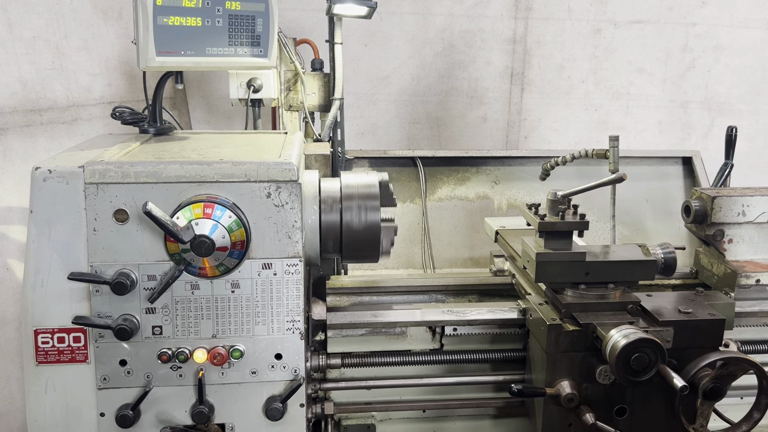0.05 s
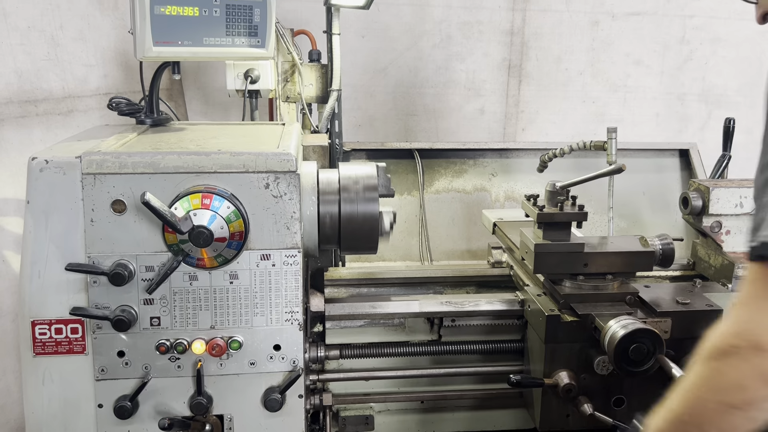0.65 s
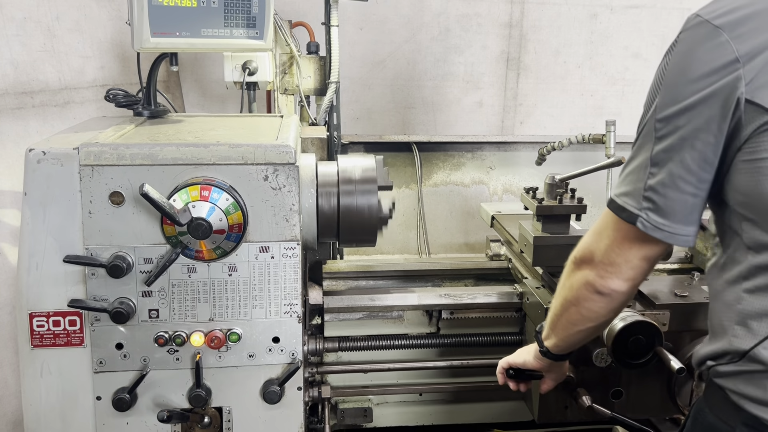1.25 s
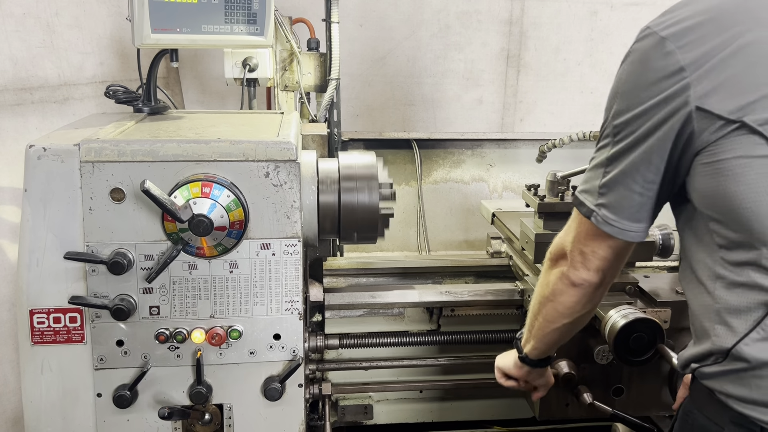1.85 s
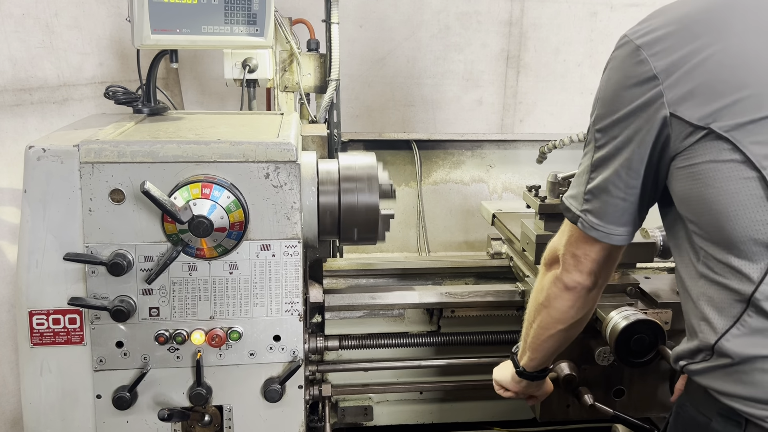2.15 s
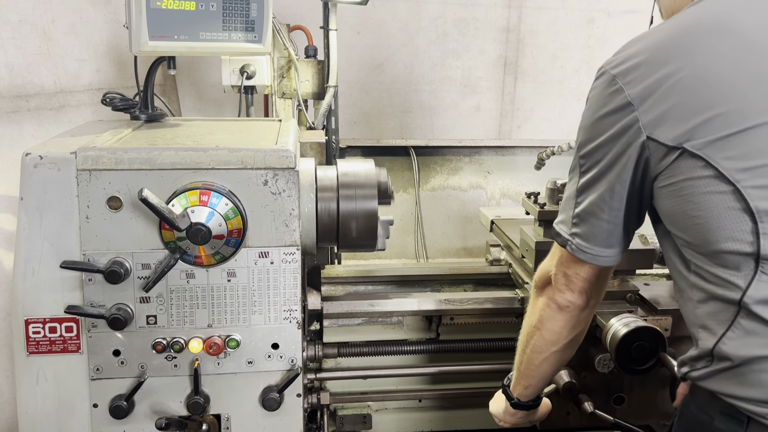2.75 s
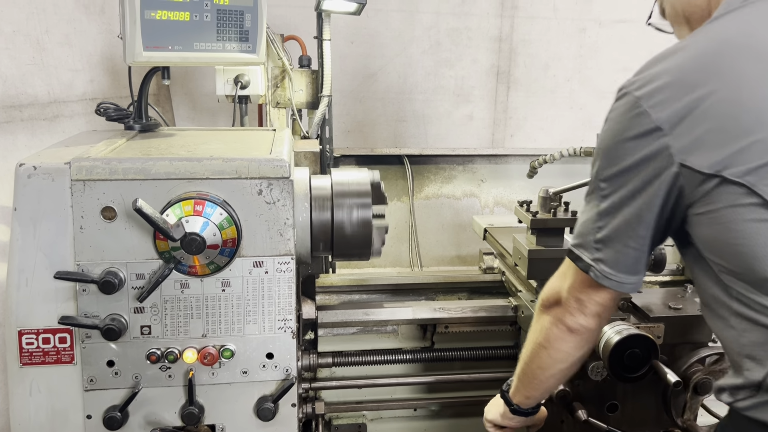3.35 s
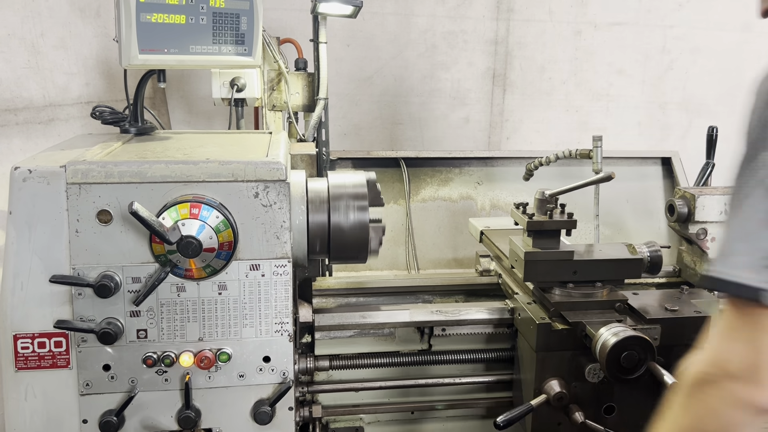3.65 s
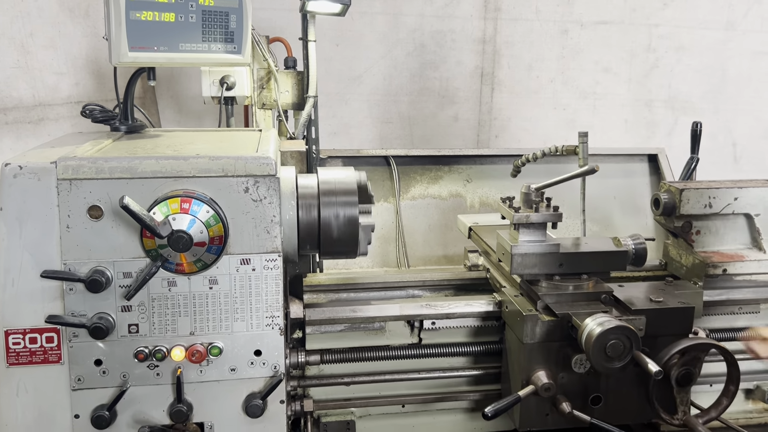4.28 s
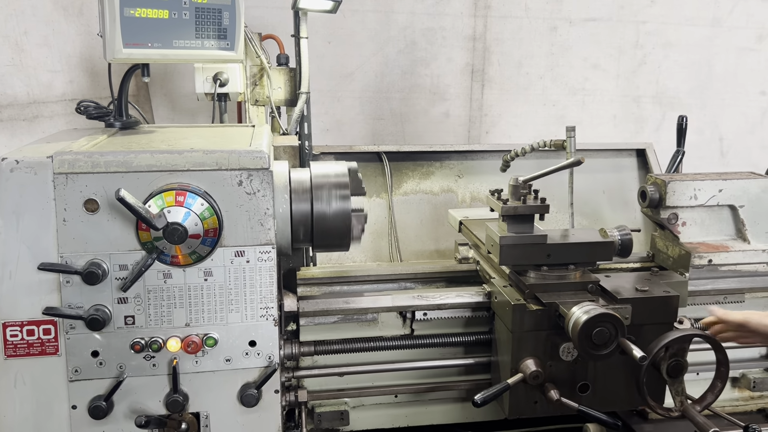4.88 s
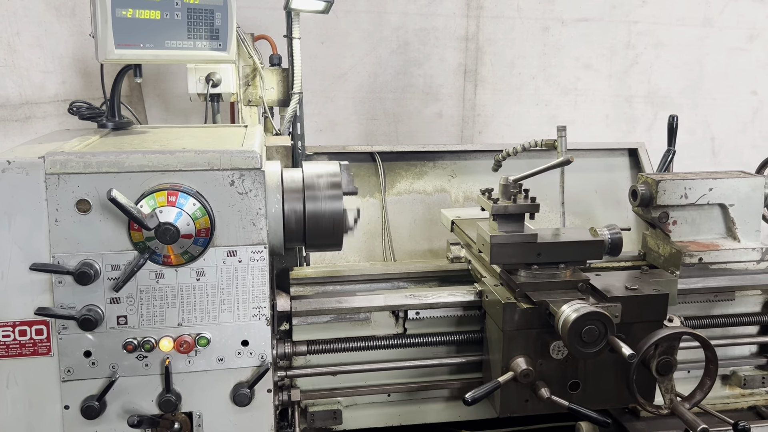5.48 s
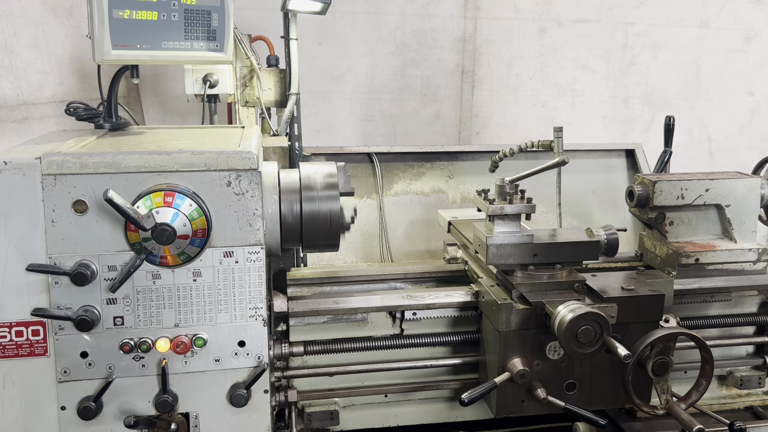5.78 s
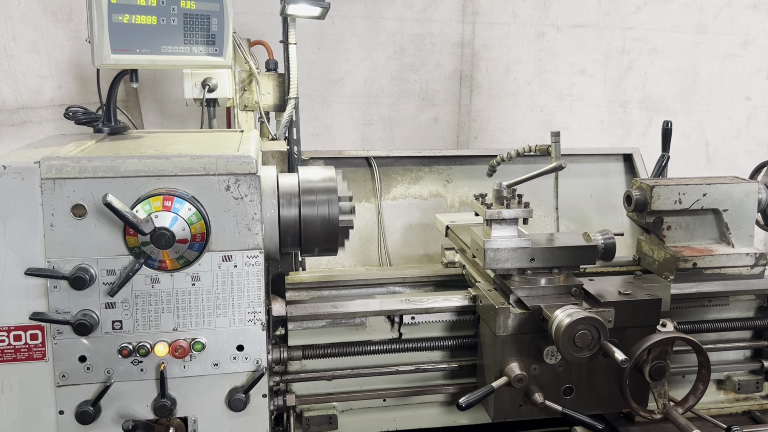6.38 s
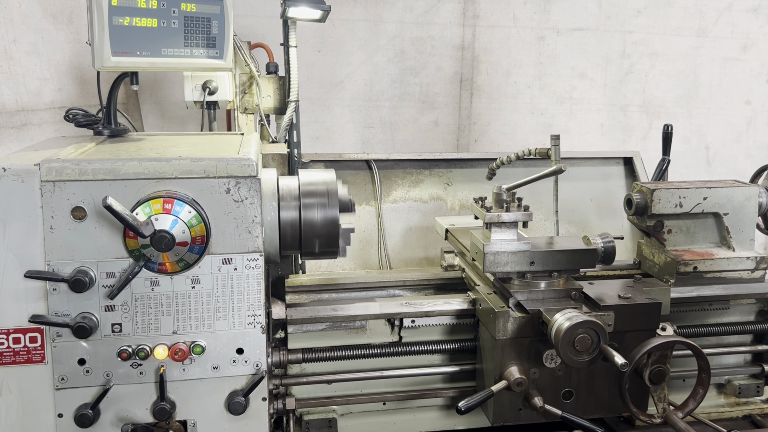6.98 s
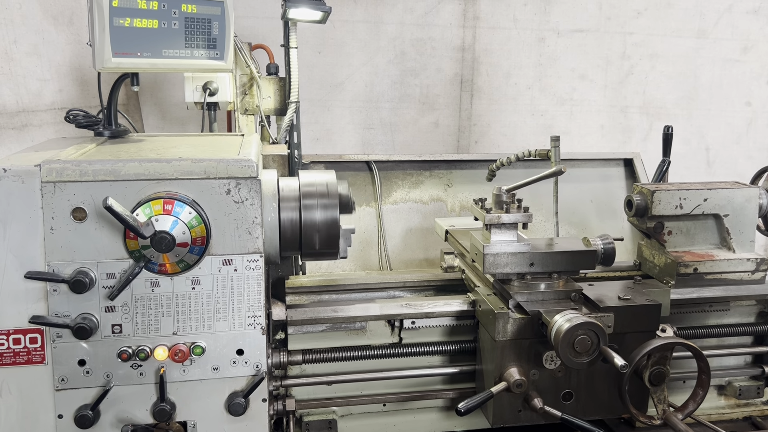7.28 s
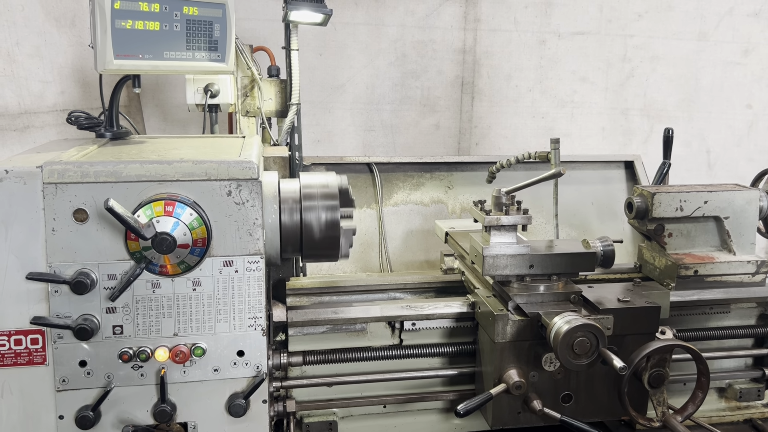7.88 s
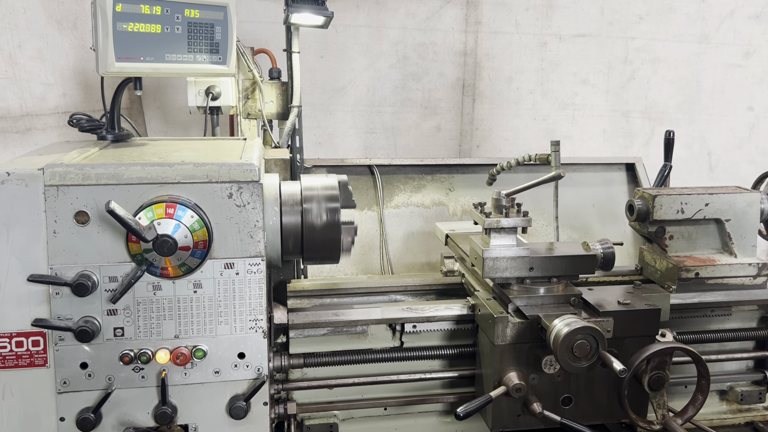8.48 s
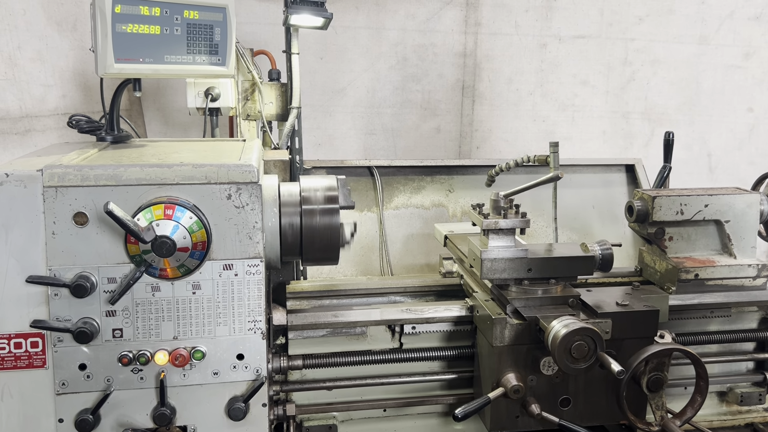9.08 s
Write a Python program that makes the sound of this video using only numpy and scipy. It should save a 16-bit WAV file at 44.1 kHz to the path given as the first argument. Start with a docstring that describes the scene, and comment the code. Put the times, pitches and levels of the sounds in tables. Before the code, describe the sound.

Heard close up in stereo, a geared lathe drones steadily in a workshop, with layered gear whine, a fluttering hum and a high whistle above a churning rumble. A faint metallic tick comes from a lever near the start. Midway, one loud clank with a low thud marks the clutch engaging and leaves a short steel ring. The gears then whine on at the same speed, the whistle now quieter.

```python
"""A workshop, the stereo microphone a step away from a geared centre lathe running at constant speed.
Motor and headstock gears whine in many lines over the rumble of bearings and churning oil, with a
wavering hum and the whistle of the fastest mesh. Early on, the apron lever gives one small tick.
Midway the feed clutch drops in with a steel clank and a thud of the apron that ring out in the room;
the gears then carry the carriage along."""
import sys
import numpy as np
from scipy import signal
from scipy.fft import rfft, irfft, next_fast_len
from scipy.io import wavfile

SR = 44100
rng = np.random.default_rng(int(sys.argv[2]) if len(sys.argv) > 2 else 0)


def to_wav(s):
    """Save 16-bit WAV."""
    ch = np.atleast_2d(s).T  # columns
    pcm = np.round(np.clip(ch, -1, 1) * 32767)  # PCM
    wavfile.write(sys.argv[1], SR, pcm.astype(np.int16))


N = 402633

SHAFT_HZ = (18.85, 28.9)   # turns a second of the two fast shafts
# The clutch dogs meeting. Each row: start in seconds, strength in dB.
DOG_CONTACTS = [(4.5412, -23), (4.5638, -7), (4.5650, 2.5), (4.5692, -15), (4.5760, -14.5), (4.5810, -8)]
# Slow swell of the gear growl in the low middle. Each row: time in seconds, gain in dB.
GROWL_SWELL = [(0, -1), (.8, -1), (1.15, -0.3), (1.4, -0.5), (1.7, 0), (3.5, 0), (3.9, -0.9), (4.8, 0.2),
               (5.3, 0.5), (6.7, 0.2), (7.1, -.5), (8.25, -1), (8.38, 1), (8.52, 0), (9.1, 0.6)]
GROWL_HZ, GROWL_WIDTH_HZ = 620, 400
# How alike left and right sound. Each row: frequency in Hz, likeness from -1 (opposed) to 1 (the same).
STEREO_LIKENESS = [(450, 1), (550, 0.64), (1100, 0.5), (1700, 0.06), (3800, 0.2), (5600, 0.2), (7300, 0.5),
                   (8500, 0.9), (9230, -1), (11100, -1), (11450, 1), (12800, 1), (13000, 0.5)]


def gear_whine(speed_wander=0.00025, jitter_rad=0.17, waver_db=1.24, runout=0.03, gain_db=0.41):
    """All lines follow one motor speed; tooth errors make each flutter, untrue shafts throb on them."""
    # Motor and gear lines. Each row: frequency in Hz, level running free in dB, level with the feed
    # engaged in dB, left over right in dB, lead of the left side in radians.
    gear_lines = [(68, -60, -57, 2, 0), (74.7, -53, -52, 1, -0.1), (97.6, -59, -52, 1, 0),
                  (102, -58, -53, 1, 0), (107.7, -54, -52, 2, 0), (124.5, -57, -55, 2, 0),
                  (173.9, -49, -50, -1, 0.1), (250.3, -52, -53, 1, 0.2), (300.1, -53, -56, 1, -0.4),
                  (325, -49, -48, 0, 0), (349.9, -49, -48, -1, -0.2), (361.7, -55, -51, 1, 0.0),
                  (422.6, -47, -48, 1, -0.2), (457.6, -55, -56, 2, 0), (511.8, -41.5, -41.5, -1, 0.3),
                  (517.1, -48, -47, -1, 0.2), (580.1, -58, -57, -1, -0.6), (587.5, -47, -47.5, -7, -0.1),
                  (620.8, -53, -50, -2, 0.1), (665, -52, -51, 1, -0.1), (685, -52, -51, 2, 0.9),
                  (694.1, -38, -37, -4, 0.5), (700.5, -45, -45, -4, 0.7), (723, -35.3, -37.6, 5, 0.0),
                  (747.6, -51, -52, -3, -0.1), (752, -44, -45.5, -8, 0.1), (761.1, -57, -55, 0, 0.1),
                  (771.8, -54, -54, -2, 0.1), (896.7, -50, -48, 1, 0.1), (925.6, -52, -47, -2, 0.5),
                  (931.3, -57, -48, 1, -0.1), (940.1, -56, -51, -3, -0.5), (992.9, -53, -56, -5, 0.5),
                  (1037.6, -55, -63, 2, -0.1), (1115.4, -54, -55, -6, -1.5), (1137.6, -51, -50, -2, -0.5),
                  (1156.1, -56, -54, 0, 1.3), (1174.9, -38.7, -39, 1, -0.2), (1193.7, -46.5, -50, -5, 0.4),
                  (1203.8, -55, -56, 3, -0.6), (1212.6, -53, -53, -4, 0.0), (1260.4, -54, -61, 1, 0.4),
                  (1324.3, -55, -56, 3, 1.4), (1367.4, -54, -56, -1, 0.9), (1417.2, -57, -55, 0, 0.8),
                  (1451.5, -46.5, -48.5, 4, -0.8), (1456.2, -55, -59, 5, -0.2), (1463.2, -49, -51, 3, 0.7),
                  (1509.3, -54.5, -53.5, -1, -0.3), (1596.5, -50, -50, -2, 3.0),
                  (1636.5, -53, -55, -3, 0.8), (1665.5, -60, -59, 0, 1.1), (1694.4, -57, -62, 3, -0.4),
                  (1729.4, -46, -50, 2, 0.4), (1742.8, -56, -65, 0, 1.0), (1762.7, -50, -44, -4, 0.3),
                  (1781.2, -58, -55.5, -3, 0.6), (1791.3, -60, -57, -4, -0.4), (1821.6, -49, -48, -1, 1.2),
                  (1862.3, -51, -57, -5, 1.6), (1880.1, -63, -55, -1, 0.3), (1995.9, -60, -58, 7, 1.4),
                  (2313.1, -55, -55, 2, 1.9), (2570.5, -58, -65, -4, 3.0), (2628.1, -59, -65, 7, 1.1),
                  (2937.3, -61, -59, -1, 2.1), (3060.7, -67, -61, 9, 1.0), (3523.7, -58, -66, 9, 0.7),
                  (3857.8, -69, -69, 2, 1.3), (4112.8, -69, -67, 10, -0.7), (4698.6, -72, -72, 3, -0.8)]
    # Slow swell of the singing upper meshes. Each row: time in seconds, gain in dB.
    singing_swell = [(0, -1.5), (1.2, 1.5), (2.3, 1.5), (3.3, 1.3), (4.4, -0.2), (4.7, -3), (5.3, 0.4),
                     (9.1, -0.5)]
    t = np.arange(N) / SR
    motor_time = t + speed_wander * np.cumsum(drift(1.38)) / SR
    engaged = np.clip((t - DOG_CONTACTS[0][0]) / 0.22 + .5, 0, 1)   # the load comes on over 0.22 s
    slow_throb, fast_throb = [1 + runout * np.sin(2 * np.pi * hz * motor_time) for hz in SHAFT_HZ]
    wavers = [from_db(gain_db + waver_db * drift(5)) for _ in range(7)]
    jitters = [jitter_rad * drift(14) for _ in range(11)]
    growl = from_db(in_time(GROWL_SWELL)) - 1
    singing = from_db(in_time(singing_swell)) - 1
    out = np.zeros((2, N))
    for k, (hz, free_db, fed_db, balance_db, lead) in enumerate(gear_lines):
        phase = 2 * np.pi * ((hz * motor_time + rng.random()) % 1) + jitters[k % len(jitters)]
        load = from_db(free_db) * (1 - engaged) + from_db(fed_db) * engaged
        swell = 1 + growl * within(hz, GROWL_HZ, GROWL_WIDTH_HZ) + singing * within(hz, 1280, 500)
        throb = slow_throb if hz > 1000 else fast_throb   # fine-toothed meshes ride on the slower shaft
        level = load * swell * wavers[k % len(wavers)] * throb
        pan = sides(balance_db - 2)   # all lines shifted a little to the right
        out += np.sqrt(2) * pan * level * np.sin(np.float32([phase + lead, phase]))
    return out


def headstock_rumble(repeating=0.24, churn_depths=(.07, .02), flutter_db=0.8):
    """Bearings, churned oil and uneven teeth shake the casting; the mids pulse as the shafts turn."""
    # Noise of bearings and oil. Each row: frequency in Hz, density in dB per Hz.
    bearing_spectrum = [(30, -86), (42, -68.5), (60, -65.5), (100, -60.5), (250, -68), (600, -70),
                        (1300, -64.5), (1750, -64.5), (2100, -72.5), (2900, -76), (4200, -83.5),
                        (8000, -90), (12500, -101.0), (15500, -104.4)]
    # Resonances of the casting and guards. Each row: centre in Hz, width in Hz, lift in dB.
    panel_resonances = [(217, 16, 3), (270, 90, 7), (374, 33, 1.5), (405, 68, 8.5), (477, 36, 7),
                        (519.7, 53, 10), (580, 94, 4.5), (662.4, 29, 10), (680, 20, 7.5), (720, 19, 5),
                        (785, 67, 7.5), (895, 82, 5), (943, 49, 4.5), (1046, 62, 5.5), (1154, 45, 6),
                        (1277, 18, 7.5), (1380, 91, 5.5), (1867, 12, 5.5), (2360, 660, 3.5),
                        (2342, 29, 8.5), (2918, 36, 7), (3510, 220, 3.5), (5680, 180, 2.5), (6800, 740, 2)]
    # Quiet gaps between them. Each row: centre in Hz, width in Hz, dip in dB.
    panel_gaps = [(446, 20, -2), (557, 21, -2.5), (733, 16, 0), (800, 24, -1.5), (964, 16, -1),
                  (1074, 30, -3), (1223, 18, -1.5), (1336, 16, -5.5), (1430, 14, -4.5), (1710, 61, -0.5)]
    # Where the rumble sits in the stereo image. Each row: frequency in Hz, left over right in dB.
    balance = [(100, -1.3), (250, 3), (500, 0.5), (800, 0.5), (2000, -0.5), (2800, 2.5), (5500, 5.5),
               (9500, 1)]
    # How far its left side leads the right. Each row: frequency in Hz, lead in radians.
    left_lead = [(150, .02), (700, 0.26), (1500, 0.27), (3000, 0.82), (4200, 0.72), (6500, 0)]

    def casting(hz):
        lifts_db = sum(db / (1 + (2 * (hz - centre) / width) ** 2)
                       for centre, width, db in panel_resonances + panel_gaps)
        gain = from_db(at_hz(bearing_spectrum, hz) + lifts_db) * np.sqrt(SR / 2)
        lead = np.exp(1j * np.array([[.5], [-.5]]) * at_hz(left_lead, hz))
        return gain * sides(at_hz(balance, hz)) * lead

    def mid_side_shares(hz):
        alike = np.clip(at_hz(STEREO_LIKENESS, hz), -.994, .994)
        return np.sqrt(np.array([1 + alike, 1 - alike]) / 2)

    # the same worn teeth meet again on every turn, so part of the shaking repeats
    turn_lengths = [round(SR / hz) for hz in SHAFT_HZ]
    teeth = sum(rng.standard_normal((2, length))[:, np.arange(N) % length] for length in turn_lengths)
    shaking = rms_one(rng.standard_normal((2, N)) + repeating * teeth)
    mid, side = colour(shaking, mid_side_shares)
    rumble = colour(mid + side * [[1], [-1]], casting)
    churning = colour(rumble, lambda hz: within(hz, centre_hz=1900, width_hz=1900))
    t = np.arange(N) / SR
    turns = 1 + sum(depth * np.sin(2 * np.pi * hz * t) for hz, depth in zip(SHAFT_HZ, churn_depths))
    pulsing = turns * from_db(flutter_db * drift(15))
    return swelling(rumble, GROWL_SWELL, GROWL_HZ, GROWL_WIDTH_HZ) + (pulsing - 1) * churning


def headstock():
    """Whine and rumble together, with two narrow bands that rise and fall unevenly."""
    # Uneven throb of the low gear drone. Each row: time in seconds, gain in dB.
    drone_throb = [(0, -0.5), (.25, 1), (.45, 6.5), (.72, -2.5), (.95, 4), (1.45, -1.5), (1.85, 1),
                   (2.3, -1.5), (2.85, -3.5), (3.6, 1), (3.8, -0.5), (4.2, 2), (4.6, 0), (5.4, 1),
                   (6.1, -1), (6.8, -2.5), (7.5, 1.5), (8.1, -2.5), (8.35, 4), (8.65, 0), (8.9, -2.5)]
    # Surges around the gear tones that the feed brings up. Each row: time in seconds, gain in dB.
    feed_tone_surges = [(0, 2), (.7, 1), (1.9, -1), (2.65, -2), (3.1, -2), (3.3, -7), (3.8, 0), (4.4, 2),
                        (4.85, 0.5), (5.1, -8), (5.75, 5), (6.05, -2), (6.3, 3), (6.55, -3), (6.8, 0),
                        (7.15, -2.5), (8.15, 3.5), (8.35, -1), (8.7, 2), (9.1, 0)]
    gears = swelling(gear_whine() + headstock_rumble(), drone_throb, centre_hz=515, width_hz=50)
    return swelling(gears, feed_tone_surges, centre_hz=932, width_hz=45)


def feed_clutch(crack_s=0.0011, rattle_s=0.012, steel_db=-5.5, mode_split=0.00284, room_db=-10):
    """The dogs snap home in a few quick contacts that set the steel ringing, and the apron thuds."""
    # Colour of each contact's sharp crack. Each row: frequency in Hz, gain in dB.
    crack_spectrum = [(600, 5), (1200, -1), (1550, -5), (1950, 6.5), (2700, -5), (3400, 4), (4200, -9),
                      (5500, 1), (6400, -2), (8500, -2), (9900, -21), (11000, -17), (13000, -17),
                      (15000, -23)]
    # Modes of the clutch and its shaft. Each row: frequency in Hz, relative level in dB, t60 in seconds.
    steel_modes = [(1770, -26, .09), (1940, -20, .06), (2060, -20, .06), (2190, -24, .06), (2700, -28, .03),
                   (3400, -31, .03), (3397, -49, 1.0), (3526, -41, 1.2), (3595, -49, .8), (4850, -43, .06),
                   (5416, -52, .7), (5560, -42, .95), (5720, -46, .9), (6164, -48, 1.3), (6290, -50, .7),
                   (6901, -48, 1.0), (7030, -39, 1.1), (7100, -39, .9), (7250, -33, .07), (7990, -48, .5),
                   (8480, -24, .04), (8463, -45, .45), (11600, -52, .4), (14150, -50, .5),
                   (14340, -51, .25), (14750, -50, .5)]
    contacts = clicks_of(DOG_CONTACTS)
    # each contact is a short crack, scattered a little longer among the bed and guards
    burst = sum(from_db(db) * signal.lfilter([1], [1, -np.exp(-1 / (decay_s * SR))], contacts + 1e-18)
                for db, decay_s in [(-10.5, crack_s), (-29, rattle_s)])
    grit = rms_one(rng.standard_normal(N) + 0.96 * rng.standard_normal((2, N)))
    crack = colour(burst * grit, lambda hz: 2 * from_db(at_hz(crack_spectrum, hz)))
    # each mode of the shaft is a close, beating pair, which the two sides hear differently
    upper, lower = [sum(from_db(db + steel_db) * ring(contacts, hz * detune, t60)
                        for hz, db, t60 in steel_modes) for detune in (1 + mode_split, 1 - mode_split)]
    steel = np.array([upper + .5 * lower, lower + .5 * upper])
    direct = (crack + steel) * sides(balance_db=5) + apron_thud()
    return direct + from_db(room_db) * workshop_reverb(direct.mean(axis=0))


def apron_thud(gain_db=-3, low_cut_hz=77):
    """The heavy apron is jolted as the slack is taken up; it radiates little deep bass."""
    # The load arriving. Each row: time in seconds, strength in dB, length of the push in seconds.
    jolts = [(4.5745, 0, .0007), (4.5800, 4.5, .0009), (4.6160, 9, .008)]
    # Modes of the apron. Each row: frequency in Hz, relative level in dB, t60 in seconds.
    apron_modes = [(108, -31, .16), (132, -28.5, .11), (190, -33.5, 2.0), (198, -25, .22),
                   (365, -20.5, .11), (575, -23, .09), (700, -28, .05), (980, -29, .05)]
    pushes = pushes_of(jolts)
    thud = sum(from_db(db + gain_db) * ring(-pushes, hz, t60) for hz, db, t60 in apron_modes)
    return signal.sosfilt(signal.butter(3, low_cut_hz, "high", fs=SR, output="sos"), thud)


def motor_hum():
    """A 400 Hz hum, heard wavering irregularly in level; it beats with a weaker gear line just below."""
    # Chance rises and dips of that tone. Each row: time in seconds, level in dB.
    heard_levels = [(0, -44), (.9, -36), (1.3, -37.5), (1.8, -38), (2.85, -36), (3.1, -45.5), (3.7, -37),
                    (3.95, -36.5), (4.3, -40), (5.0, -42.5), (5.5, -35.5), (6.0, -35.5), (6.55, -41.5),
                    (7.15, -35.5), (7.6, -37.5), (7.9, -41.5), (8.85, -36.5), (9.1, -39)]
    hum = wavering_line(400.1, in_time(heard_levels), waver_db=-0.3, waver_rate=4.4,
                        balance_db=1, lead_rad=0.25, jitter_rad=0.17)
    neighbour = wavering_line(397.7, level_db=-52.5, waver_db=3, waver_rate=1.4,
                              balance_db=-3, lead_rad=0.15, jitter_rad=0.8)
    return hum + neighbour


def mesh_whistle():
    """The fastest mesh whistles; it is heard loud at first, and quieter from just before the clutch drops in."""
    # Course of the whistle. Each row: time in seconds, level in dB.
    whistle_levels = [(0, -41.5), (.35, -36.5), (.6, -40.5), (.95, -37), (1.3, -38.5), (1.7, -39),
                      (2.7, -41), (3.0, -42), (3.25, -39), (3.7, -43), (4.15, -39.5), (4.35, -47.5),
                      (9.1, -47.5)]
    return wavering_line(2349.3, in_time(whistle_levels), waver_db=-0.2, waver_rate=7,
                         balance_db=3, lead_rad=-0.21, jitter_rad=0.33)


def lever_tick(start_s=1.494, decay_s=.009, gain_db=-39.5):
    """A small bright metal tick while the hand rests on the apron lever."""
    # Colour of the tick. Each row: frequency in Hz, gain in dB.
    tick_spectrum = [(2500, -15), (4000, 8), (7500, 1), (9800, -22), (11500, -7), (14500, -8)]
    since = np.arange(N) / SR - start_s
    burst = rng.standard_normal(N) * (since > 0) * np.exp(-np.abs(since) / decay_s)
    return from_db(gain_db) * colour(burst, lambda hz: from_db(at_hz(tick_spectrum, hz)))


def workshop_reverb(x, build_up_s=0.0053):
    """Diffuse stereo reverberation: octave bands of reflections, each dying at its own rate."""
    # How long the workshop rings. Each row: frequency in Hz, t60 in seconds.
    room_t60 = [(200, 0.88), (2000, 0.26), (7000, 1), (14000, 0.16)]
    t, tail = np.arange(SR) / SR, 0
    edges = np.geomspace(62, 16000, 9)
    for low, high in zip(edges, edges[1:]):
        hz = np.sqrt(low * high)
        octave = signal.butter(2, [low, high], "band", fs=SR, output="sos")
        mid, side = signal.sosfilt(octave, rng.standard_normal((2, SR)))
        alike = at_hz(STEREO_LIKENESS, hz)
        band = np.sqrt(1 + alike) * mid + np.sqrt(1 - alike) * side * [[1], [-1]]
        tail = tail + band * np.exp(-np.log(1000) * t / at_hz(room_t60, hz))
    tail *= 1 - np.exp(-t / build_up_s)   # reflections build up over the first metres
    return signal.fftconvolve(x[None], rms_one(tail) / np.sqrt(SR), axes=1)[:, :N]


def wavering_line(hz, level_db, waver_db, waver_rate, balance_db, lead_rad, jitter_rad):
    """One stereo tone whose loudness and phase waver by chance."""
    phase = 2 * np.pi * (hz * np.arange(N) / SR + rng.random()) + jitter_rad * drift(7)
    level = from_db(level_db + waver_db * drift(waver_rate))
    return np.sqrt(2) * level * sides(balance_db) * np.sin([phase + lead_rad, phase])


def ring(clicks, hz, t60):
    """A unit click sets a sine of height 1 ringing; it falls 60 dB in t60 seconds."""
    radius, angle = np.exp(-np.log(1000) / (t60 * SR)), 2 * np.pi * hz / SR
    return signal.lfilter([0, np.sin(angle)], [1, -2 * radius * np.cos(angle), radius ** 2], clicks + 1e-18)


def clicks_of(events):
    """One impulse for each row of seconds and dB."""
    out = np.zeros(N)
    for s, db in events:
        out[round(s * SR)] += from_db(db)
    return out


def pushes_of(events):
    """One rounded push centred on each event's time; a long one shakes only the low modes."""
    out = np.zeros(N)
    for s, db, length_s in events:
        push = np.hanning(max(round(length_s * SR), 3))
        start = round(s * SR) - len(push) // 2
        out[start:start + len(push)] += from_db(db) * push / push.sum()
    return out


def swelling(x, curve, centre_hz, width_hz):
    """Let one band rise and fall along a curve of seconds and dB."""
    band = colour(x, lambda hz: within(hz, centre_hz, width_hz))
    return x + (from_db(in_time(curve)) - 1) * band


def drift(rate, hop=40):
    """Smooth random wander of spread 1, changing about `rate` times a second."""
    pole = np.exp(-2 * np.pi * rate * hop / SR)
    slow = signal.lfilter([1], [1, -2 * pole, pole ** 2], rng.standard_normal(N // hop + 2002))[2000:]
    return np.interp(np.arange(N) / hop, np.arange(len(slow)), rms_one(slow))


def colour(x, gain_at):
    """Filter by a gain that depends on frequency."""
    size = next_fast_len(N)
    return irfft(rfft(x, size) * gain_at(np.fft.rfftfreq(size, 1 / SR)), size)[..., :N]


def within(hz, centre_hz, width_hz):
    """Near 1 inside a band, falling smoothly to 0 outside."""
    return 1 / (1 + (2 * (hz - centre_hz) / width_hz) ** 6)


def sides(balance_db):
    """Left and right gains of constant total power; positive is to the left."""
    gains = from_db(np.array([[.5], [-.5]]) * balance_db)
    return gains / np.sqrt(np.mean(gains ** 2, axis=0))


def at_hz(points, hz):
    """Read a table on a log-frequency axis."""
    freqs, values = np.transpose(points)
    return np.interp(np.log(np.maximum(hz, 1)), np.log(freqs), values)


def in_time(points):
    """Read a curve of seconds and values at every sample."""
    return np.interp(np.arange(N) / SR, *np.transpose(points))


def from_db(db):
    """Decibels to gain."""
    return 10 ** (np.asarray(db) / 20)


def rms_one(x):
    """Scale to unit rms."""
    return x / np.sqrt(np.mean(x ** 2) + 1e-20)


def scene():
    """The running lathe and its clutch, from a step away."""
    return headstock() + motor_hum() + mesh_whistle() + feed_clutch() + lever_tick()


def record(dry):
    """The microphone loses the deepest bass, the highest peaks are rounded and the top is cut."""
    low_cut_hz, high_cut_hz, ceiling = 34, 15750, .85
    thinned = signal.sosfilt(signal.butter(4, low_cut_hz, "high", fs=SR, output="sos"), dry)
    rounded = ceiling * np.tanh(thinned / ceiling)
    return signal.sosfilt(signal.ellip(10, .2, 80, high_cut_hz, fs=SR, output="sos"), rounded)


dry = scene()
out = record(dry)
to_wav(out)
```